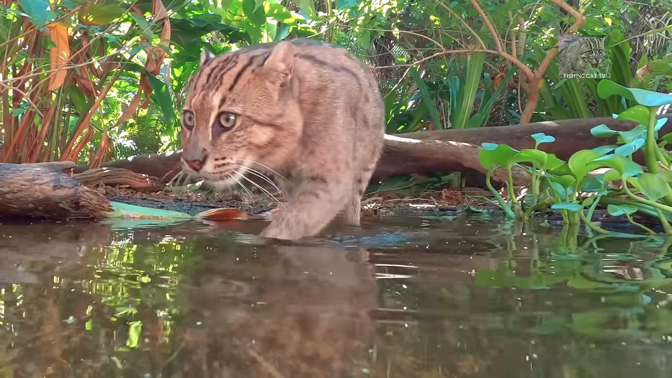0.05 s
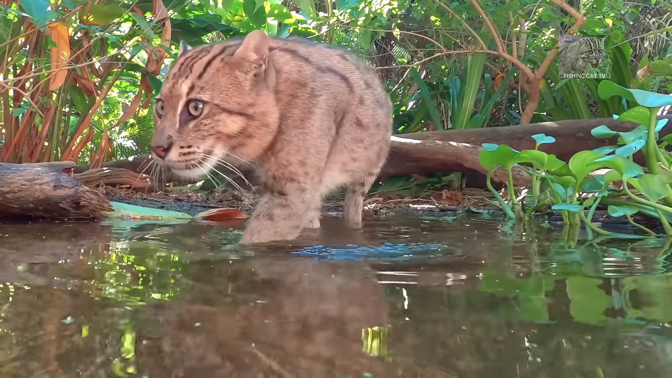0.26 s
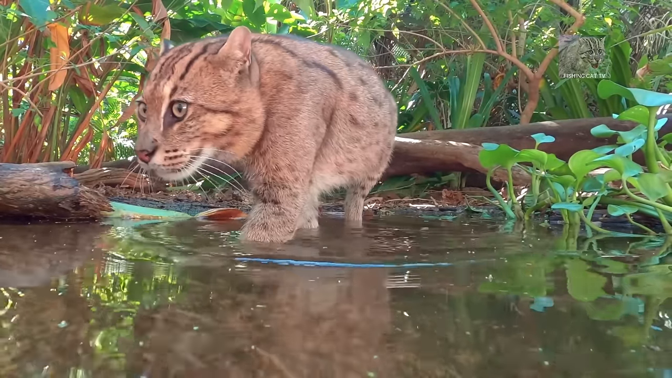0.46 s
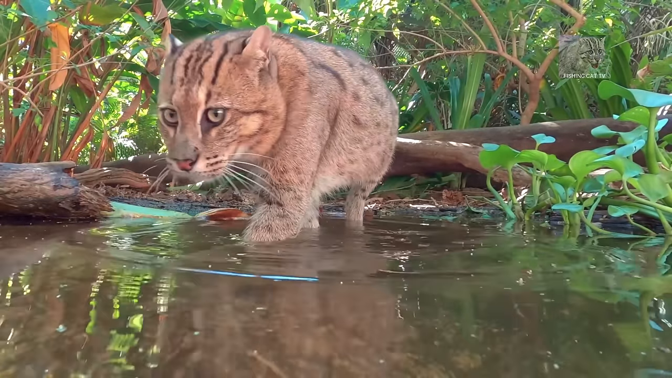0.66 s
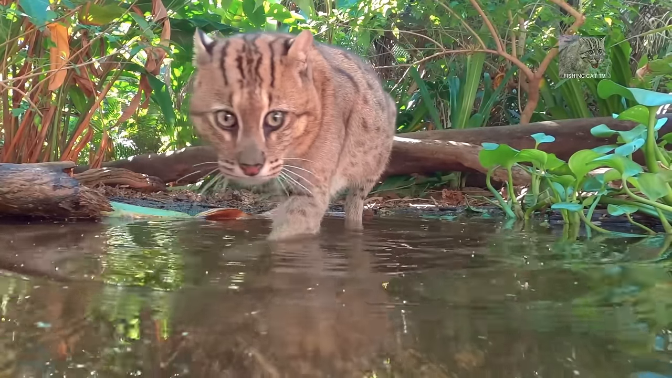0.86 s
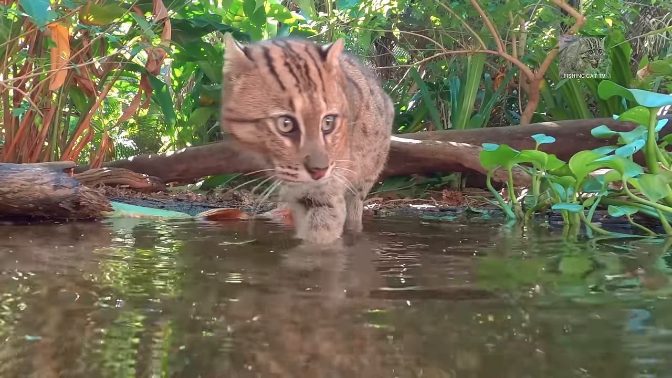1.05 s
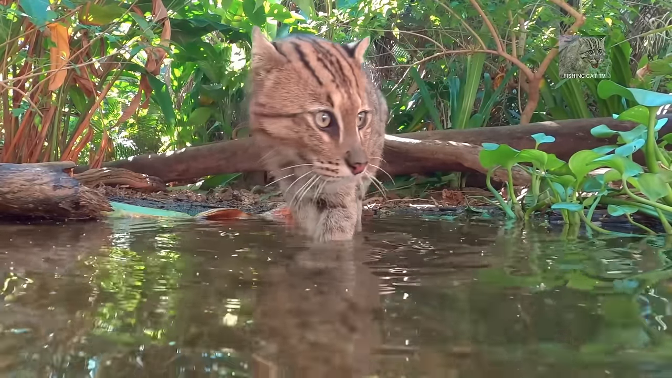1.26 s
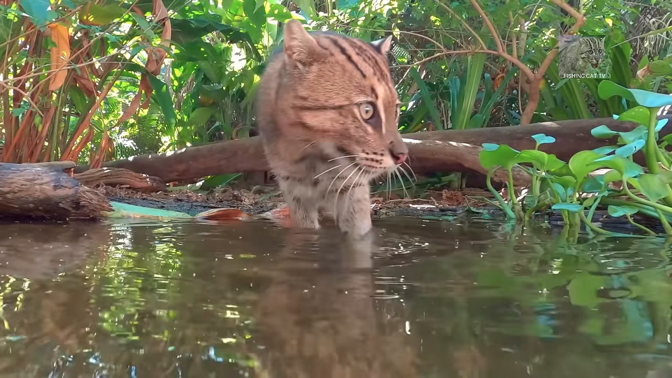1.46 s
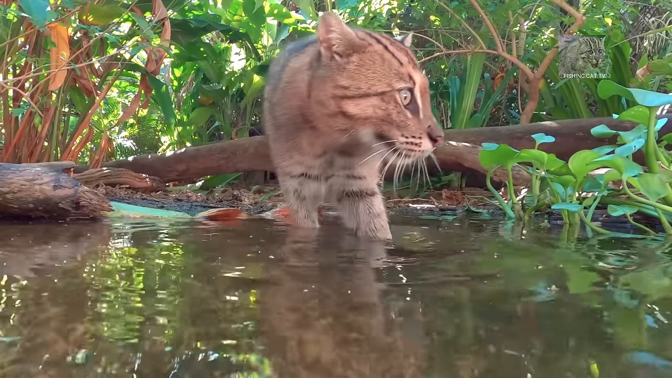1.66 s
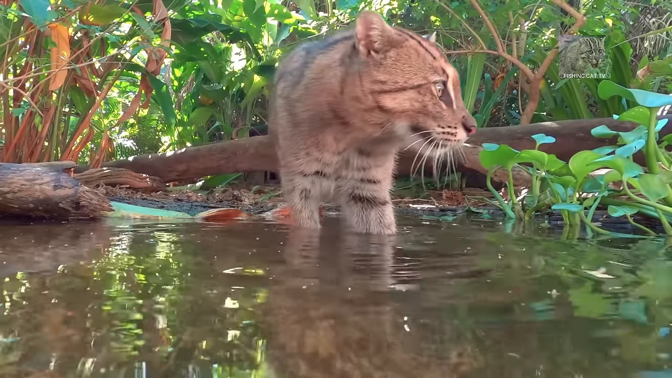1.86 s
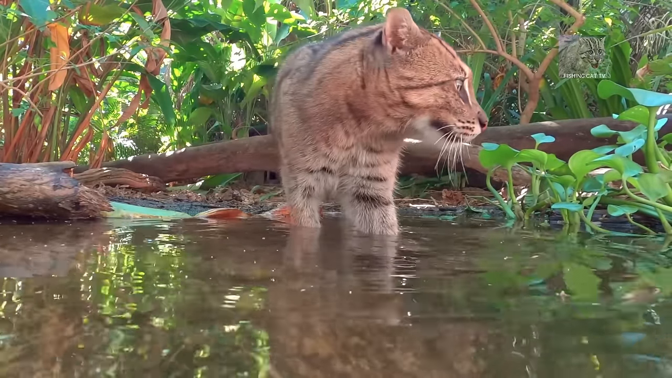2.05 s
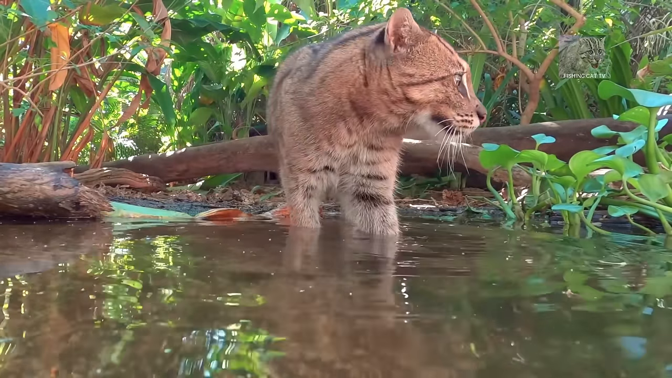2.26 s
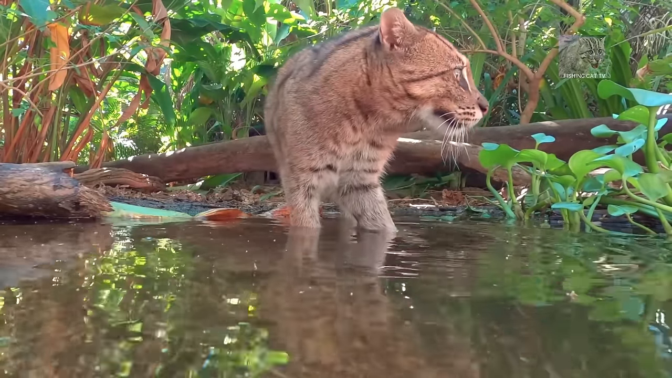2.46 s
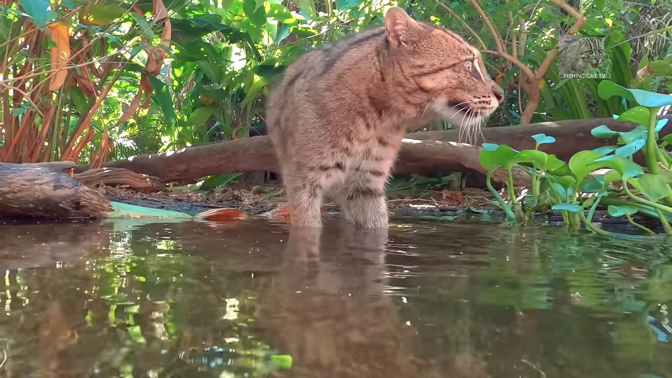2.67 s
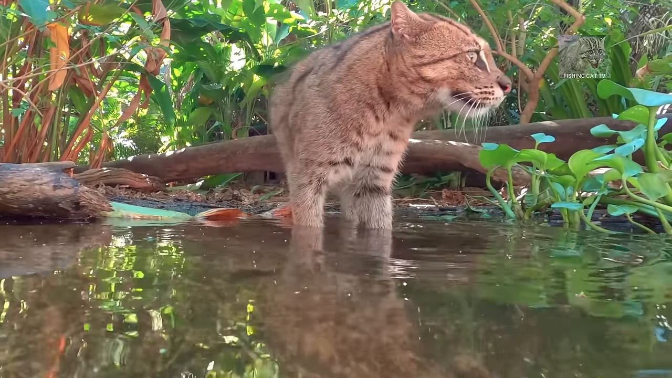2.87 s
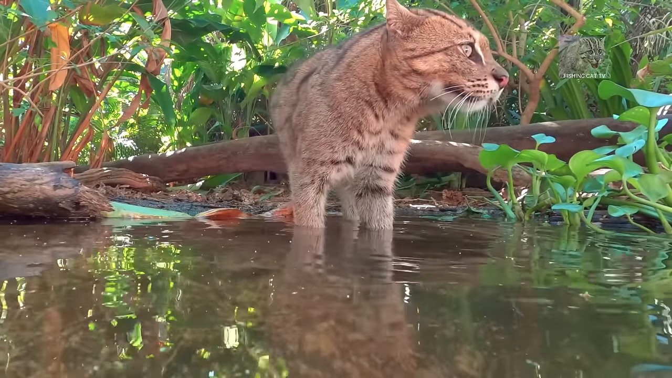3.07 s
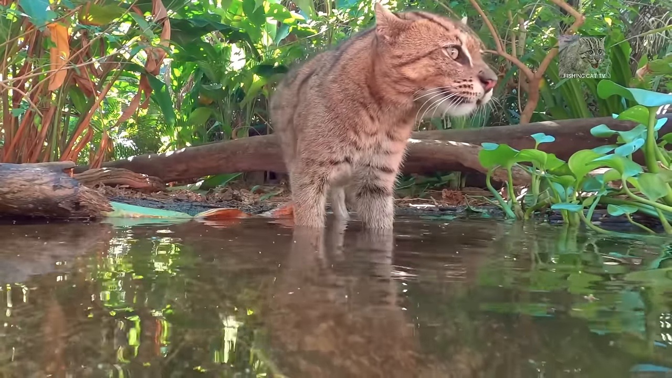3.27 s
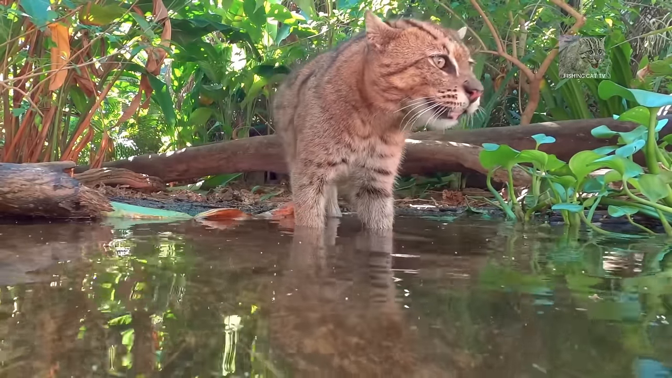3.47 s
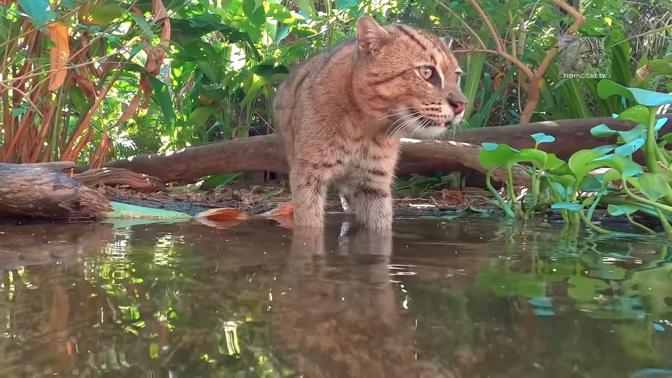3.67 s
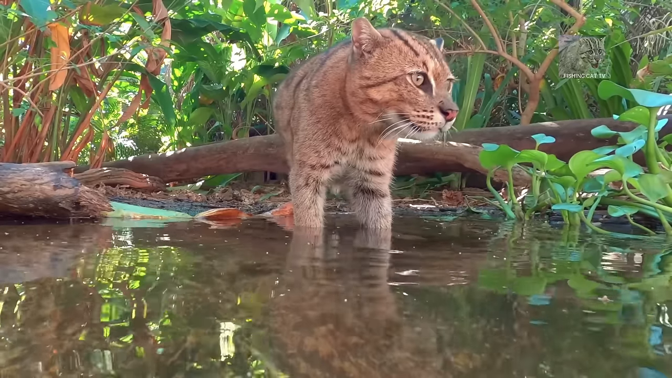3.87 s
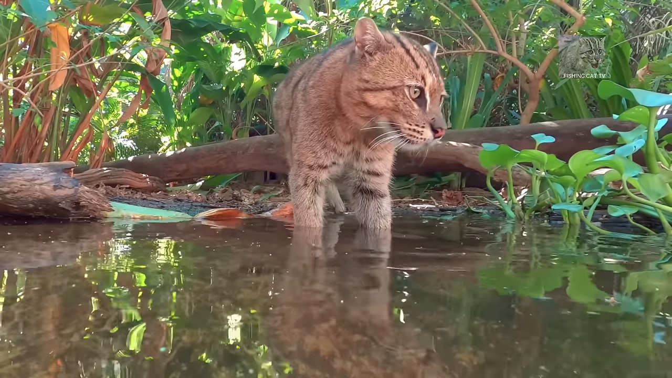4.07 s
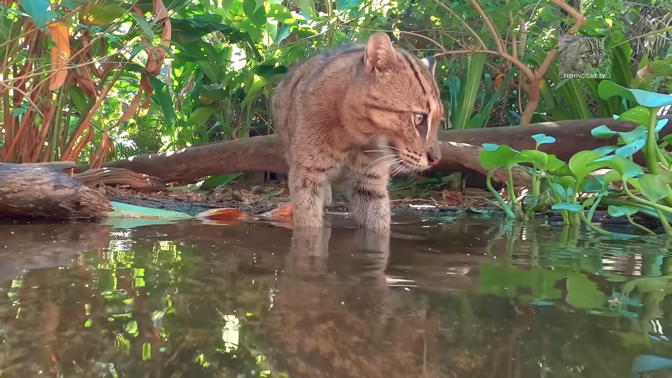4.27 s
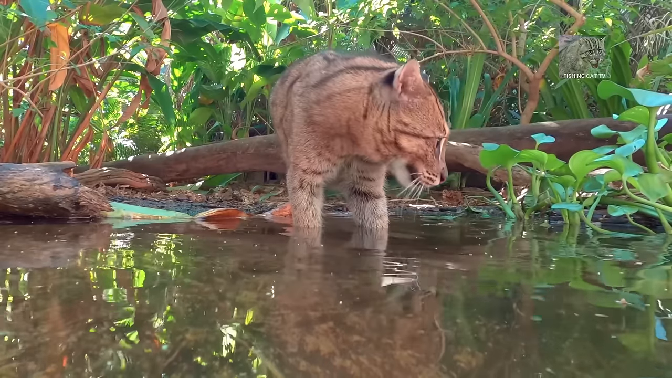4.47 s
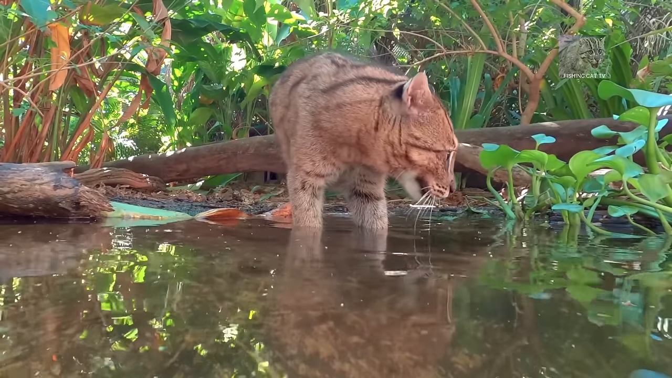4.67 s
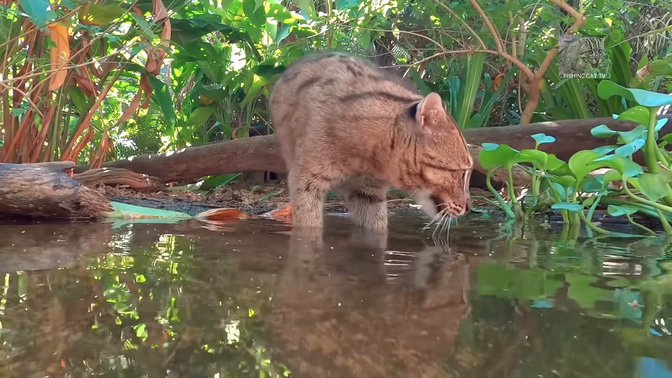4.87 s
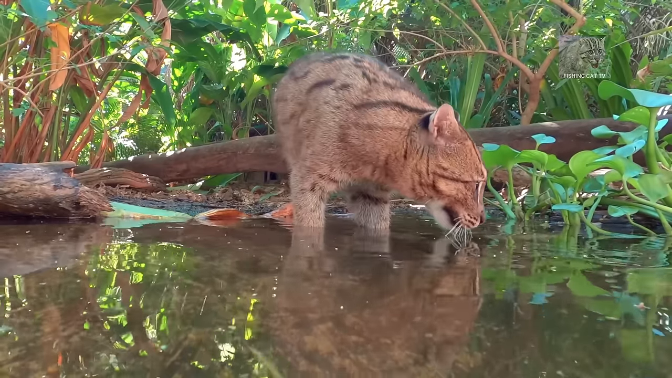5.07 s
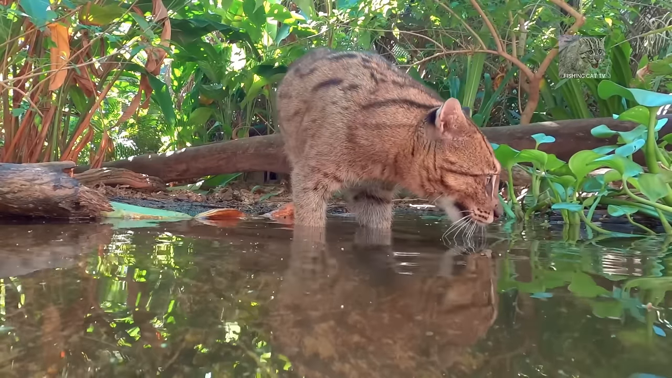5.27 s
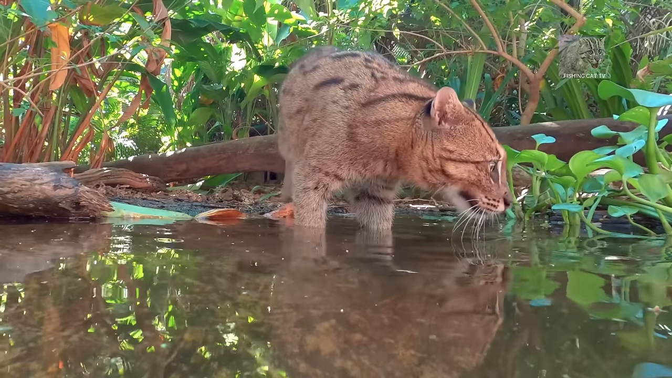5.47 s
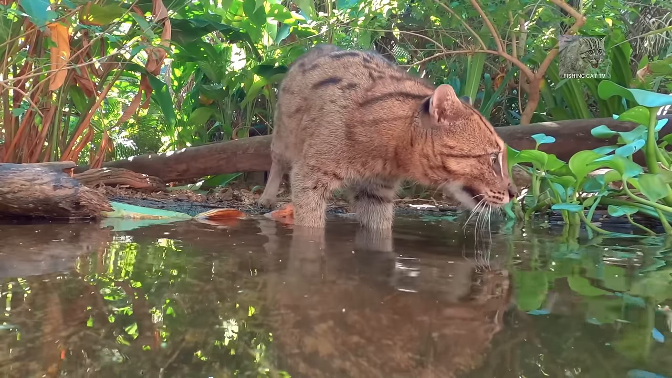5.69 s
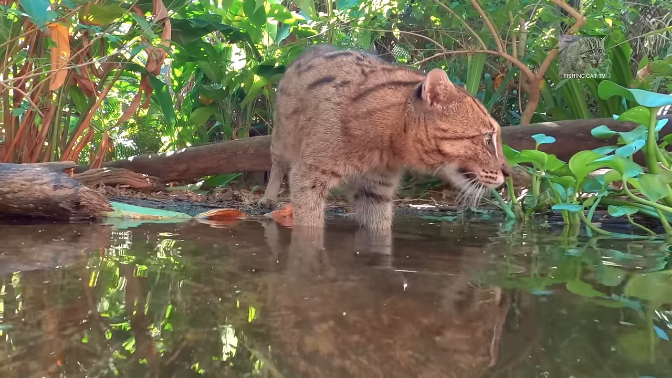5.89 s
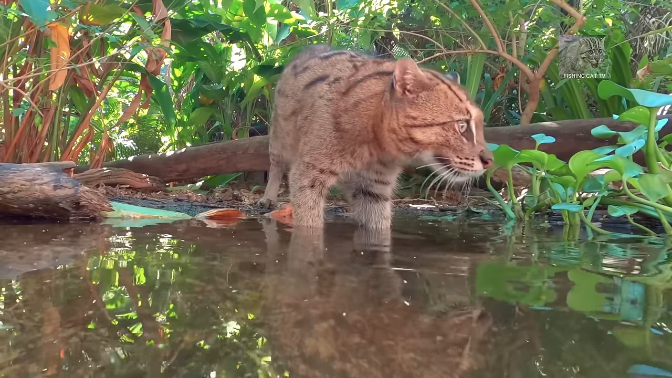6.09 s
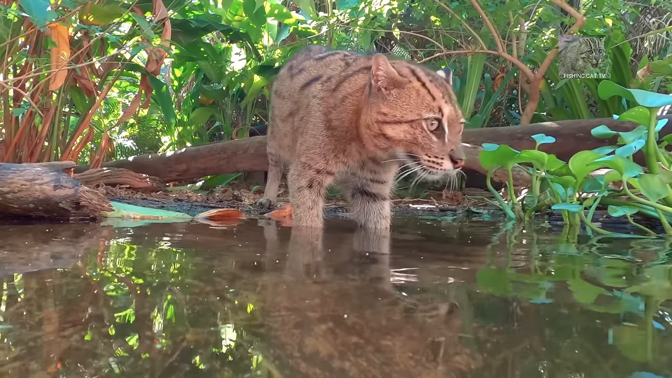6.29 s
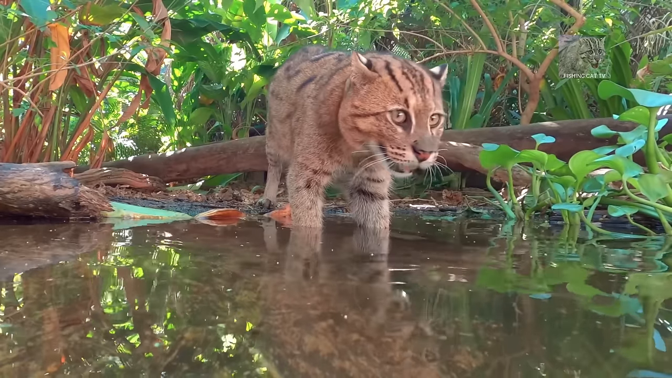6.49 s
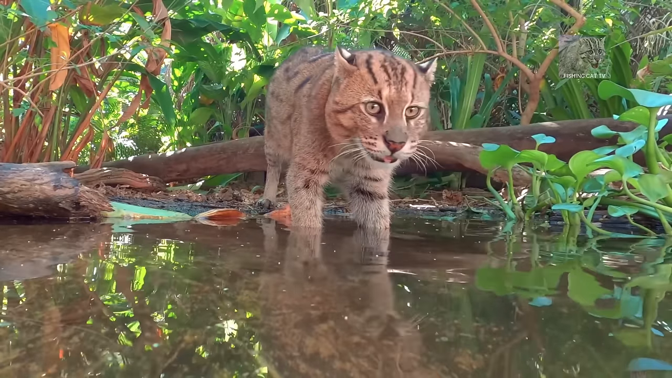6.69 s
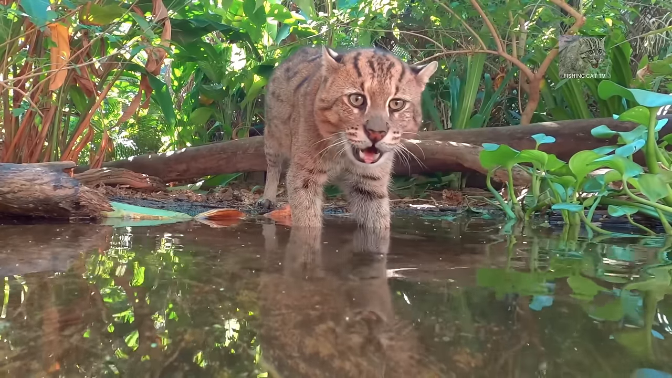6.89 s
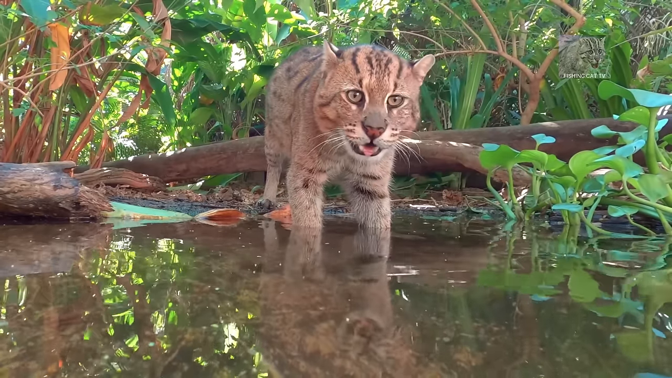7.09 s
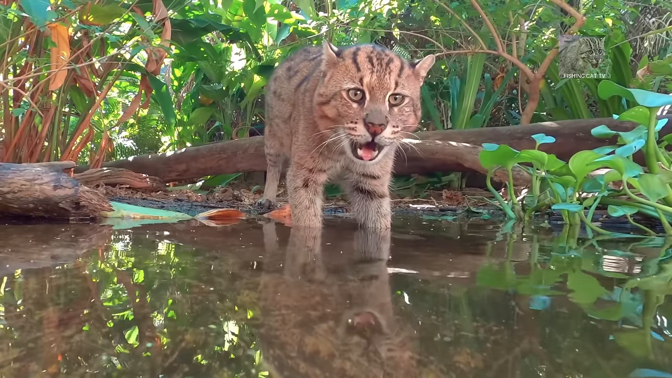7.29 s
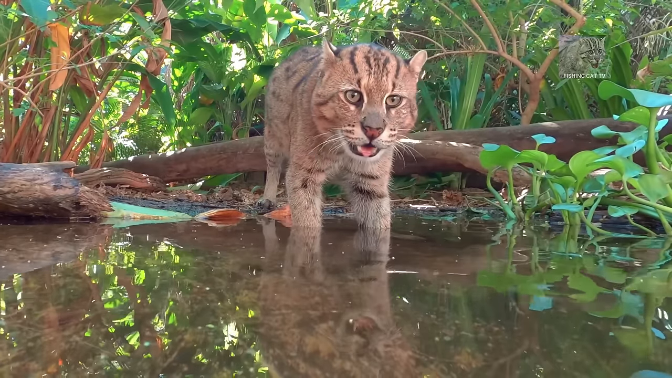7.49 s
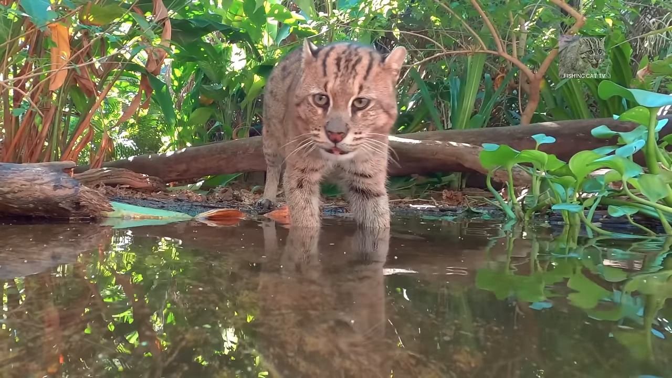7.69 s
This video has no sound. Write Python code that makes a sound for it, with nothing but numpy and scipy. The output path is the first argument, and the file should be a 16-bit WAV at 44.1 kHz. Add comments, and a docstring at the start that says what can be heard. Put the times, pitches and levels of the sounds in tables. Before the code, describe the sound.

In a quiet wooded pond setting, soft low air rumble, a barely audible distant engine hum, thin throbbing insects and a blurred far bird chorus continue throughout. From 0.05 to 0.9 s a nearby, centred wild cat gives a hoarse chuckle of rapid bursts, a short clear cry near 0.3 s, more rough bursts, then a weak higher whine. A slurred bird song overlaps it, and a swooping whistle follows at 0.9 s. Level pipes and little flicks sound from 1.2 to 2.5 s, beside a faint high pulsing trill lasting until 3.7 s. At 3.5-4.1 s the cat chuckles again, low and grating, with a brief cry at 3.85 s and a breathy tail. Faint chips run from 4.2 to 5.2 s, then slurred song, and swooping whistles at 6.0 and 6.4 s. From 6.9 s the loudest call stutters, opens into a strong cry around 7.15-7.3 s, breaks roughly, and rises clear until 7.7 s, with tiny peeps alongside.

```python
"""In a pond among trees, a wild cat calls three times: a chuckle of rough bursts opens into a clear cry.
Its voice is a train of uneven pulses and puffs of air ringing through moving resonances of throat and head.
Small birds whistle around it as wavering sine tones with echoes, or buzz and trill as narrow noise bands.
A far chorus of noise and soft slurs swells and fades, insects throb in narrow noise bands, small ticks click.
Under it all lie two low lines of a distant engine and the shaped noise of the open air."""
import sys
import numpy as np
from scipy import signal
from scipy.io import wavfile
from scipy.ndimage import uniform_filter1d

SR = 44100
rng = np.random.default_rng(int(sys.argv[2]) if len(sys.argv) > 2 else 0)


def generate_wav(sig):
    """Save sig (samples, or channels by samples) to the path in sys.argv[1] as 16-bit PCM at SR."""
    pcm = np.round(np.clip(np.atleast_2d(sig).T, -1, 1) * 32767).astype(np.int16)
    wavfile.write(sys.argv[1], SR, pcm)


N = 341421  # length of the scene [samples]

# Colour of the outdoor rumble: (frequency [Hz], relative level per Hz [dB])
AIR_COLOUR = [(12, -34.5), (20, 6.5), (90, -6), (207, -0.5), (491, -8.5), (931, -17), (1870, -15.5),
              (2470, -21.5), (3540, -23), (3960, -29), (5230, -28.5), (6720, -35.5), (8390, -35.5),
              (10500, -39), (15500, -52.5)]
AIR_DB = -58.5
# How alike the two channels of a noise are: (frequency [Hz], likeness [0-1])
LIKENESS = [(60, 0.66), (150, 0.91), (380, 0.94), (950, 0.92), (2380, 0.72), (5980, 0.18), (15000, 0.04)]
# A distant engine: (time [s], upper line level [dB], lower line level [dB])
DRONE = [(0.0, -77, -72), (1.4, -71, -86.5), (2.56, -63.5, -65), (3.12, -77.5, -75), (3.64, -55.5, -68),
         (4.33, -73.5, -61.5), (5.07, -57, -66), (5.58, -79, -78), (6.75, -89, -68.5), (7.48, -65, -77),
         (7.74, -95.5, -91)]
# Pitches of its two lines: (upper [Hz], lower [Hz])
DRONE_HZ = (181, 90.6)
# Insect bands: (centre [Hz], width [Hz], level before throbbing [dB], throb rate [per s])
INSECTS = [(2754, 170, -79, 24), (5230, 270, -87, 22), (8478, 580, -89, 55)]

# Crest of each wave of far calling, before smoothing: (time [s], level [dB])
CHORUS_CRESTS = [(.42, -58.5), (.86, -64), (1.53, -63), (2.0, -69), (2.48, -60.5), (3.11, -59),
                 (3.74, -62.5), (4.43, -62.5), (5.21, -59), (5.76, -57.5), (6.41, -60), (6.9, -59.5),
                 (7.5, -65.5)]
# Colour of the far calling: (frequency [Hz], relative level per Hz [dB])
CHORUS_COLOUR = [(760, -23), (1300, -6.5), (1390, -13.5), (1490, 0.5), (1800, -2.5), (2220, -5),
                 (2500, -16.5), (3250, -42), (5500, -120)]
WAVE_RISE_DB_PER_S, WAVE_FALL_DB_PER_S = 58.5, 58.5
# Single slurs that stand out of the chorus; WARBLE_HZ is the range of starting pitches
WARBLES_PER_S, WARBLE_HZ, WARBLE_S, WARBLE_DB = 30, (1432, 2270), 0.055, -4

# A far trill in long pulses: (start [s], pitch [Hz], starting level [dB])
TRILL = [(1.28, 3450, -75), (1.7, 3640, -72), (2.12, 3580, -73.5), (2.54, 3600, -74.5), (2.96, 3576, -74),
         (3.4, 3569, -74), (5.65, 3600, -72.5)]
TRILL_S, TRILL_FADE_DB = 0.3, 7.5  # length and fade of one pulse
# Hoarse bird notes: (start [s], end [s], first pitch [Hz], last pitch [Hz], level [dB])
BUZZES = [(0.134, 0.173, 2000, 2440, -58.5), (0.503, 0.537, 2980, 2960, -59.5), (0.8, .87, 3060, 3360, -62),
          (5.192, 5.272, 1890, 2560, -60.5)]
# Small wet ticks: (time [s], starting level before filtering [dB], pitch [Hz])
TICKS = [(0.1963, -58.5, 2920), (3.4245, -54.5, 3460), (3.619, -46, 2200), (5.8003, -52, 2300),
         (6.8767, -52, 2290), (7.545, -46.5, 2290)]
SWOOP_TICK_DB = -7  # each swoop starts with a short sharp click; level against the swoop

# A faint even series of falling chips:
# (first pitch [Hz], last pitch [Hz], fall within a chip [Hz], first level [dB], growth [dB])
CHIPS = (2829.5, 2680, 111, -73, 11)
# When they come: (first time [s], spacing [s])
CHIP_TIMES = (4.189, .078)
# A pair of whistles, flick up and fall, then a small arch; one table a note:
# (time after the start [s], pitch [Hz], level against the pair [dB])
SWOOP = [
    [(0, 2400, -22), (.007, 3400, -9.5), (.014, 3577, -8.5), (.022, 3452, -2.5), (.042, 2976, -0.5),
     (.058, 2785, -9.5)],
    [(.076, 2770, -18), (.084, 3080, 0.5), (.093, 3117, -11.5), (.103, 2990, 0), (.113, 2740, -9.5)],
]
# Each pair: (start [s], level [dB])
SWOOPS = [(.915, -46), (5.981, -46.5), (6.373, -45.5)]
# Level piped notes: (start [s], length [s], level [dB])
PIPES = [(1.228, .095, -58), (1.356, 0.028, -58.5), (1.721, 0.068, -52.5), (1.802, 0.047, -56),
         (1.87, 0.049, -63.5), (2.236, 0.059, -49.5), (2.339, 0.023, -53.5), (2.383, 0.059, -61),
         (2.46, 0.075, -70)]
PIPE_HZ = 2740
# A quick drop in pitch beside some pipes: (start [s], level [dB])
FLICKS = [(1.276, -55.5), (1.778, -53), (2.294, -51)]
# A slurred song, one table a note: (time after the start [s], pitch [Hz], level against the song [dB])
SONG = [
    [(0, 3020, -28), (.018, 2870, -4), (.038, 2720, -18.5), (.05, 2470, -3), (.066, 2320, -1.5),
     (.078, 2290, 3.5), (.09, 2520, -9.5), (.097, 2700, -21)],
    [(.112, 3000, -11), (.13, 2780, -7), (.145, 2600, -7), (.165, 2380, 0.5), (.19, 2240, -5.5),
     (.215, 2200, -17)],
    [(.24, 1640, -10.5), (.272, 2120, -14), (.3, 1880, -8.5), (.34, 1720, -13)],
    [(.345, 1960, -18), (.36, 1920, -3), (.385, 2020, 4), (.4, 2060, -13)],
    [(.412, 1590, -8), (.435, 1540, -8), (.475, 1660, -28)],
]
# Each song: (start [s], level [dB])
SONGS = [(.195, -58.5), (5.272, -52)]
# Single slurred notes: (start [s], length [s], first pitch [Hz], last pitch [Hz], level [dB])
NOTES = [(.66, 0.14, 1680, 1830, -61.5), (2.295, .03, 4300, 3780, -67), (4.02, 0.062, 2020, 1720, -60),
         (4.84, .045, 1760, 1540, -64), (4.98, .06, 2030, 1780, -60), (5.045, 0.022, 1720, 1500, -61),
         (6.8, 0.04, 1620, 2140, -69), (6.843, 0.027, 2140, 1950, -70), (6.96, 0.15, 2008, 1986, -58.5),
         (7.44, 0.022, 3000, 2780, -56.5), (1.31, 0.062, 1950, 1750, -66)]
# Far low coos: (start [s], length [s], first pitch [Hz], last pitch [Hz], level [dB])
COOS = [(5.15, 0.2, 830, 828, -68.5), (6.33, 0.11, 420, 440, -59), (6.6, 0.15, 430, 410, -57)]
# How far a note's ends lie below its top, and the shares of its length between which the top is held
NOTE_RISE_DB, NOTE_FALL_DB, NOTE_TOP = 14, 7, (.3, 0.77)
# A short peep that hooks up, then stays level: (time after the start [s], pitch [Hz], level against the peep [dB])
PEEP = [
    [(0, 3200, -6.5), (.007, 3443, 2), (.014, 3570, -3), (.028, 3550, -15.5)],
]
# Each peep: (start [s], level [dB])
PEEPS = [(7.4, -57), (7.466, -55), (7.537, -57)]

# The cat's voice, one table a call: (time [s], pitch [Hz], main throat resonance [Hz])
VOICE = [
    [(.045, 418.4, 750), (.095, 335.6, 745), (.1, 261.8, 618), (.277, 244.9, 705), (.283, 430.3, 834),
     (.35, 452.1, 886), (.422, 405.8, 857.5), (.432, 277.4, 795), (.545, 276.6, 927), (.555, 375, 770),
     (.587, 393.6, 840), (.625, 619, 750), (.7, 655, 814), (.8, 606, 760), (.822, 578, 760),
     (.83, 573, 1260), (.89, 560, 1044)],
    [(3.47, 628, 604), (3.53, 417.2, 685), (3.535, 294.7, 624.6), (3.592, 284.9, 642.5),
     (3.6, 228.8, 640.7), (3.79, 221.4, 689), (3.795, 272.2, 710), (3.838, 278.3, 827), (3.86, 307.1, 887),
     (3.892, 281.4, 868), (3.95, 291.3, 855), (4.0, 286.8, 1027), (4.125, 262.6, 1016)],
    [(6.868, 641.8, 1100), (6.886, 579.2, 990), (6.918, 389.6, 833), (6.935, 291.8, 703),
     (7.0, 251.6, 683.7), (7.035, 218.3, 720), (7.077, 228, 695), (7.083, 247.6, 803), (7.155, 268.8, 804),
     (7.167, 277.3, 838.3), (7.269, 284.3, 897), (7.3, 305, 882), (7.305, 287, 880), (7.41, 286.8, 863.3),
     (7.455, 229.8, 748.7), (7.5, 242.1, 910), (7.535, 283.3, 960), (7.591, 290.3, 1020),
     (7.631, 309, 1181), (7.695, 311, 1230), (7.74, 329.3, 1316)],
]
# Unevenness of the vocal folds from each time on: (time [s], roughness [0 clear - 1 chaotic])
ROUGHNESS = [(0, .2), (.1, .42), (.28, .2), (.32, .02), (.422, .6), (.55, .12), (.623, .05), (.825, .9),
             (3.4, .15), (3.533, .22), (3.597, .35), (3.793, .25), (3.842, .03), (3.892, .22), (3.955, .95),
             (6.8, .26), (6.925, .7), (6.978, .4), (7.14, .15), (7.165, .02), (7.3, .5), (7.502, .25),
             (7.53, .08), (7.55, .012)]
# Bursts of the chuckle: (start [s], length [s], peak level [dB], ends below the peak [dB])
BURSTS = [ (0.041, 0.063, -47.5, 13), (0.094, .048, -36, 15.5), (0.16, 0.047, -32.5, 20),
          (0.22, 0.059, -31, 26), (0.418, 0.058, -34.5, 15), (0.487, 0.053, -41.5, 15.5),
          (0.556, 0.063, -38.5, 20), (0.803, 0.071, -49, 15), (3.469, 0.059, -46.5, 5.5),
          (3.534, 0.059, -31, 26), (3.6, 0.058, -31, 23), (3.664, 0.063, -29, 28.5),
          (3.733, 0.05, -29, 21.5), (3.804, 0.037, -27, 6), (3.893, 0.066, -27.5, 16),
          (3.953, 0.069, -40.5, 14), (4.066, 0.063, -49.5, 15.5), (6.866, .055, -34.5, 3),
          (6.927, .052, -35, 9), (6.98, 0.04, -29.5, 15), (7.034, 0.04, -26.5, 16), (7.087, .057, -25.5, 4),
          (7.296, 0.059, -17.5, 1.5), (7.363, 0.039, -21.5, 10.5), (7.407, 0.049, -25.5, 17),
          (7.464, 0.033, -25.5, 8.5), (7.502, 0.034, -23.5, 6), ]
BURST_PEAK = 0.49  # share of the length at which a burst peaks
# Held cries, one table each: (time [s], level [dB])
CRIES = [
    [(0.283, -50.5), (0.297, -32.5), (0.389, -34.5), (0.409, -30.5), (0.422, -37)],
    [(0.623, -46), (0.645, -46.5), (0.685, -46.5), (0.783, -58.5), (0.823, -47)],
    [(3.848, -24), (3.884, -22), (3.89, -31)],
    [(7.14, -24.5), (7.17, -19), (7.3, -15.5)],
    [(7.53, -22), (7.558, -20), (7.682, -17), (7.74, -20.5)],
]
# Low chest resonance: (centre [Hz], width [Hz], level before the fade below [dB])
CHEST = (262, 122, 0.13)
# Chest hum fades as the throat opens: (main resonance [Hz], change of level [dB])
CHEST_FADE = [(620, 2.5), (700, -11), (850, -19), (1200, -31.5)]
# Upper mouth resonance follows the main one: (main resonance [Hz], upper resonance [Hz])
MOUTH = [(600, 996), (850, 1356), (1250, 1650)]
# Level of the upper resonance: (mouth shut [dB], mouth wide [dB])
MOUTH_OPEN_DB = (-11.5, -3.5)
MAIN_WIDTH_HZ, MOUTH_WIDTH_HZ = 240, 301
BREATH_WIDE = 0.94  # gain of the breath that a rough burst spreads over the whole throat
# Head resonances, the first one brightened further by high notes: (centre [Hz], width [Hz], level [dB])
HEAD = [(1893, 300, -38.5), (3040, 490, -44.5), (3400, 170, -49.5), (8100, 510, -60)]
BRIGHT_DB_PER_OCTAVE, BRIGHT_FROM_HZ = 24, 340
# Air past the teeth, one table a stretch: (time [s], level before burst surges and trim [dB], centre [Hz])
HISS = [
    [(0.16, -88, 6570), (0.28, -73, 5190), (0.3, -67.5, 5220)],
    [(0.78, -98, 5270), (0.84, -74, 5140), (0.9, -90, 5350)],
    [(3.54, -90, 5160), (3.886, -61.5, 4900), (3.968, -72, 5080), (3.996, -55, 4770), (4.044, -80, 4970),
     (4.092, -67.5, 4820), (4.13, -83, 5090)],
    [(6.9, -78, 5200), (7.03, -81.5, 5660), (7.26, -67, 6670), (7.338, -60, 6070), (7.446, -78, 5200),
     (7.55, -62, 6020), (7.662, -56.5, 5419), (7.725, -56.5, 5480)],
]


def gain_of(db):
    """Turns decibels into gain."""
    return 10 ** (np.asarray(db) / 20)


def evened(x):
    """Scales to rms 1."""
    return x / np.sqrt(np.mean(x ** 2) + 1e-20)


def read(points, hz):
    """Reads a spectrum on a log-frequency axis."""
    f, value = np.transpose(points)
    return np.interp(np.log(hz + 1), np.log(f + 1), value)


def played(tables, fade):
    """Joins tables into curves over all samples; also gives a soft gate that is open inside them."""
    t = np.arange(N) / SR
    size = round(fade * SR)
    s, *columns = np.transpose(np.vstack(tables))
    inside = sum((t >= rows[0][0]) & (t <= rows[-1][0]) for rows in tables) > 0
    gate = uniform_filter1d(inside * 1., size, mode="nearest")
    curves = [np.interp(t, np.maximum.accumulate(s), c) for c in columns]
    return gate, uniform_filter1d(curves, size, axis=1, mode="nearest")


def resonate(x, hz, width):
    """Shifts the curve hz down to zero, smooths twice, shifts back: a steep resonance of gain 1."""
    r = np.exp(-np.pi * width / SR)
    if np.ndim(hz) == 0:  # a fixed pitch needs only a turned pole
        pole = r * np.exp(2j * np.pi * hz / SR)
        return 2 * signal.lfilter([(1 - r) ** 2], [1, -2 * pole, pole * pole], x).real
    turn = np.exp(2j * np.pi * np.cumsum(hz) / SR)
    smooth = signal.lfilter([(1 - r) ** 2], [1, -2 * r, r * r], x * turn.conj())
    return 2 * (turn * smooth).real


def wander(seconds):
    """Smooth random curve of rms 1 that changes within the given time."""
    size = round(seconds * SR)
    return evened(uniform_filter1d(uniform_filter1d(rng.standard_normal(N), size), size))


def echoes(x, t60, start):
    """Trees and water return sparse reflections, other ones at each ear, fading by 60 dB in t60 seconds."""
    t = np.arange(SR // 2) / SR
    signs = rng.choice([-1., 1.], (2, len(t)))
    sparse = rng.random((2, len(t))) < .05
    taps = signs * sparse * (t > start) * gain_of(-60 * t / t60)
    return signal.oaconvolve(x[None], taps / np.linalg.norm(taps[0]), axes=1)[:, :N]


def noise(colour, patchy_db):
    """Two-channel noise from random short-time spectra with drifting patches."""
    frames, hz = N // 256 + 5, np.fft.rfftfreq(1024, 1 / SR)
    a, b, c, d, patches = rng.standard_normal((frames, 513, 5)).T
    patches = evened(uniform_filter1d(uniform_filter1d(patches, size=8, axis=0), size=16, axis=1))
    same = np.clip(read(LIKENESS, hz), -1, 1)[:, None]
    left = a + 1j * b
    right = same * left + np.sqrt(1 - same ** 2) * (c + 1j * d)
    z = np.array([left, right]) * gain_of(read(colour, hz)[:, None] + patchy_db * patches)
    return evened(signal.istft(z, nperseg=1024, noverlap=768)[1][:, :N])


def air():
    """The low outdoor rumble is noise with most of its power in the bass."""
    return gain_of(AIR_DB) * noise(AIR_COLOUR, 1.5)


def drone():
    """A distant engine: noise in two very narrow low bands makes two fuzzy lines."""
    _, levels_db = played([DRONE], .1)
    return sum(gain_of(db) * evened(resonate(rng.standard_normal(N), hz, 21))
               for hz, db in zip(DRONE_HZ, levels_db))


def insects():
    """Narrow noise bands throb, and come and go at random."""
    out, t = np.zeros((2, N)), np.arange(N) / SR
    for hz, width, db, rate in INSECTS:
        throb = 0.57 + 0.41 * np.sin(2 * np.pi * rate * t + 1.9 * wander(0.74))
        band = evened(resonate(rng.standard_normal(N), hz, width))
        sides = gain_of([[-1.5], [1.5]])  # a little stronger on the right
        out += gain_of(db + 3 * wander(.5)) * throb * band * sides
    return out


def warbles():
    """Short soft slurs at chance moments and pitches, smeared by the trees."""
    out, t = np.zeros(N + SR), np.arange(SR // 8) / SR
    swell = np.sin(np.pi * np.minimum(t / WARBLE_S, 1))
    for when, pitch, slide, size in rng.random((round(WARBLES_PER_S * N / SR), 4)):
        hz = np.interp(pitch, [0, 1], WARBLE_HZ) + 6000 * (slide - .6) * t
        tone = np.sin(2 * np.pi * np.cumsum(hz) / SR)
        out[round(when * N):][:len(t)] += (.5 + size) * swell * tone
    return evened(out[:N] + 0.39 * echoes(out[:N], .5, 0.0073))


def chorus():
    """Many far callers blur into a band that swells in waves."""
    t = np.arange(N) / SR
    waves = [top_db + np.minimum(WAVE_RISE_DB_PER_S * (t - s), WAVE_FALL_DB_PER_S * (s - t))
             for s, top_db in CHORUS_CRESTS]
    swell = gain_of(uniform_filter1d(np.max(waves, 0), size=SR // 5))
    return swell * (0.86 * noise(CHORUS_COLOUR, 2.7) + gain_of(WARBLE_DB) * warbles())


def trill():
    """A fuzzy high whistle of narrow noise; each pulse starts firm and fades."""
    pulses = [[(s, f, db), (s + TRILL_S, f, db - TRILL_FADE_DB)] for s, f, db in TRILL]
    gate, (hz, db) = played(pulses, .03)
    return gate * gain_of(db) * evened(resonate(rng.standard_normal(N), hz, 120))


def buzzes():
    """Hoarse bird notes: noise in a sliding band."""
    gate, (hz, db) = played([[(a, f, db), (b, g, db)] for a, b, f, g, db in BUZZES], 0.029)
    return gate * gain_of(db) * evened(resonate(rng.standard_normal(N), hz, 290))


def ticks():
    """Each tick is a click of tone and noise that dies by 60 dB in 13 ms."""
    out, t = np.zeros(N + 400), np.arange(400) / SR
    swoop_starts = [(s, db + SWOOP_TICK_DB, 2600) for s, db in SWOOPS]
    for s, db, hz in TICKS + swoop_starts:
        ring = 0.65 * np.sin(2 * np.pi * hz * t) + 0.79 * rng.standard_normal(len(t))
        out[round(s * SR):][:len(t)] += gain_of(db - 60 * t / 0.013) * ring
    return signal.sosfilt(signal.butter(2, [1800, 8000], "band", fs=SR, output="sos"), out[:N])


def bird(tables, pan_db, echo_db, t60):
    """A near sine that wavers a little, with the echo of the trees; pan_db above 0 leans left."""
    gate, (hz, db) = played(tables, 0.0023)
    turns = np.cumsum(hz * (1 + .006 * wander(.004))) / SR
    tone = np.sqrt(2) * gate * gain_of(db + 1.5 * wander(.006)) * np.sin(2 * np.pi * turns)
    wet = tone + gain_of(echo_db) * echoes(tone, t60, 0.017)
    return wet * gain_of([[pan_db / 2], [-pan_db / 2]])


def notes(rows):
    """Each note slides from one pitch to the other, swelling, holding and fading."""
    share = np.array([0, *NOTE_TOP, 1])
    shape_db = np.array([-NOTE_RISE_DB, 0, 0, -NOTE_FALL_DB])
    return [np.c_[s + length * share, hz + (end_hz - hz) * share, db + shape_db]
            for s, length, hz, end_hz, db in rows]


def sung(phrase, rows):
    """Repeats the same phrase at each time and level."""
    return [np.add(note, (s, 0, db)) for s, db in rows for note in phrase]


def chips():
    """Fourteen alike notes, each a short fall, the series sinking and growing louder."""
    first_hz, last_hz, fall_hz, first_db, grow_db = CHIPS
    first, spacing = CHIP_TIMES
    starts = first + spacing * np.arange(14)
    share = np.linspace(0, 1, num=14) ** 2  # slow change at first, faster later
    rows = np.c_[starts, first_hz + (last_hz - first_hz) * share, first_db + grow_db * share]
    falls = [[(s, hz, db), (s + 0.024, hz - fall_hz, db)] for s, hz, db in rows]
    return bird(falls, -4.9, -1.2, 0.93)


def whistling_birds():
    """Every whistled phrase is a gliding tone with its own place and echo."""
    pipes = notes([(s, length, PIPE_HZ, PIPE_HZ, db) for s, length, db in PIPES])
    flicks = [[(s, 2750, db), (s + 0.0043, 2250, db - 5)] for s, db in FLICKS]
    out = bird(sung(SWOOP, SWOOPS), -4.5, -5.0, 0.81) + bird(pipes, -1.5, -8.5, 0.79)
    out += bird(sung(SONG, SONGS), -1, -9.5, 1.0) + bird(notes(NOTES), -1, -9.5, 0.67)
    out += bird(sung(PEEP, PEEPS), 4, -7.5, 0.39) + bird(notes(COOS), .1, -19, 0.44)
    return out + bird(flicks, -12, -2, 0.33) + chips()


def effort():
    """The cat's loudness: bursts arch up and down; cries hold."""
    share = np.linspace(0, 1, num=9)
    off_peak = np.where(share < BURST_PEAK, 1 - share / BURST_PEAK, (share - BURST_PEAK) / (1 - BURST_PEAK))
    bursts = [np.c_[s + length * share, db - ends_db * off_peak ** 2] for s, length, db, ends_db in BURSTS]
    return sorted(bursts + [np.array(cry) for cry in CRIES], key=lambda rows: rows[0, 0])


def vocal_folds(hz, rough):
    """One pulse a fold cycle, uneven in time and strength when rough, and air that rushes in each cycle."""
    uneven_pitch = np.clip(1 + .35 * rough * wander(.003) + .005 * wander(.012), .3, 3)
    turns = np.cumsum(hz * uneven_pitch) / SR
    at = np.flatnonzero(np.diff(np.floor(turns))) + 1
    late = (turns[at] % 1) / (turns[at] - turns[at - 1])  # part of a sample since the folds shut
    uneven_db = 7 * np.tanh(wander(.002)[at]) + 4 * (-1) ** np.arange(len(at))  # chance plus strong-weak pairs
    size = gain_of(rough[at] * uneven_db) * np.sqrt(SR / hz[at])
    pulses = np.zeros(N)
    pulses[at - 1], pulses[at] = size * late, size * (1 - late)
    puffs = (0.79 + 3.5 * np.exp(-(turns % 1) / 0.9)) * rng.standard_normal(N)
    return pulses, puffs


def throat(drive, puffs, main_hz, rough):
    """Chest, main and mouth resonances shape the voice and move as the throat opens."""
    chest_hz, chest_width, chest_db = CHEST
    chest_db = chest_db + np.interp(main_hz, *np.transpose(CHEST_FADE)) + 4.0 * rough
    mouth_hz = np.interp(main_hz, *np.transpose(MOUTH))
    mouth_db = np.interp(main_hz, [650, 1200], MOUTH_OPEN_DB)
    low = gain_of(chest_db) * resonate(drive, chest_hz, chest_width)
    low += resonate(drive, main_hz, MAIN_WIDTH_HZ) - 0.26 * resonate(drive, 0.62 * main_hz, 300)
    low -= gain_of(mouth_db) * resonate(drive, mouth_hz, MOUTH_WIDTH_HZ)
    low += BREATH_WIDE * rough ** 4 * resonate(puffs, main_hz, 900)
    # dark outside the throat's range
    return signal.sosfilt(signal.butter(3, [190, 1850], "band", fs=SR, output="sos"), low)


def head(drive, breath, hz):
    """Fixed head resonances add brightness; high notes ring the lowest one more."""
    first, *upper = (gain_of(db) * resonate(drive + (f > 2500) * breath, f, width) for f, width, db in HEAD)
    bright_db = BRIGHT_DB_PER_OCTAVE * np.maximum(np.log2(hz / BRIGHT_FROM_HZ), 0)
    return sum(upper) + first * gain_of(bright_db)


def teeth_hiss(pulses, breath, effort_db):
    """Air past the teeth: breath and pulses in a wide moving band that surges with each burst."""
    gate, (hiss_db, hiss_hz) = played(HISS, 0.0078)
    surge_db = .5 * (effort_db - uniform_filter1d(effort_db, size=SR // 8))
    return gate * gain_of(surge_db + hiss_db - 0.5) * evened(resonate(breath + .5 * pulses, hiss_hz, 1500))


def cat():
    """Fold pulses and breath ring a throat that opens, held to the loudness of each burst and cry."""
    _, (effort_db,) = played(effort(), .005)
    gate, (hz, main_hz) = played(VOICE, .005)
    since, level = np.transpose(ROUGHNESS)
    steps = level[np.searchsorted(since, np.arange(N) / SR, "right") - 1]
    rough = uniform_filter1d(steps, size=SR // 100)
    pulses, puffs = vocal_folds(hz, rough)
    drive = pulses + 0.7 * rough ** 2 * puffs
    breath = np.interp(main_hz, [850, 1000], [.35, .06]) * puffs  # a wide mouth sings clearer
    low = throat(drive, puffs, main_hz, rough)
    loudness = np.sqrt(abs(uniform_filter1d(low ** 2, size=SR // 40)) + 1e-9)
    voice = gate * gain_of(effort_db) * (low + head(drive, breath, hz)) / loudness
    voice += gate * teeth_hiss(pulses, breath, effort_db)
    return voice + gain_of(-18) * echoes(voice, .07, .003).mean(0)


def scene():
    """Cat in the centre, birds around, the rumble under all."""
    background = air() + drone() + insects() + chorus()
    birds = trill() + buzzes() + whistling_birds()
    return background + birds + ticks() + cat()


def band_limit(x):
    """A steep low-pass at the top of the band."""
    return signal.sosfilt(signal.butter(12, 15630, fs=SR, output="sos"), x)


def record(dry):
    """Adds microphone hiss, unrelated in the two channels and tilted to the treble."""
    hiss = gain_of(-92) * np.diff(rng.standard_normal(dry.shape), axis=1, prepend=0)
    return band_limit(dry + hiss)


dry = scene()
out = record(dry)
generate_wav(out)
```